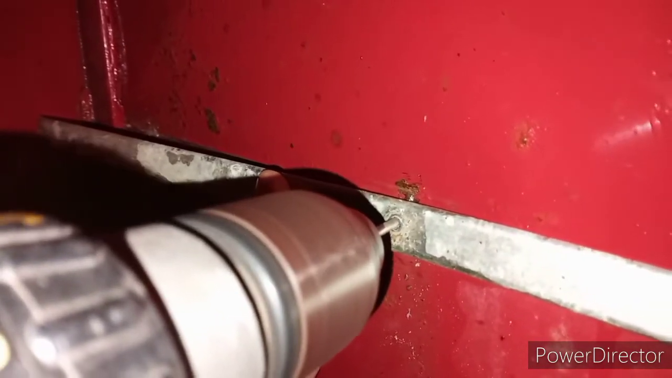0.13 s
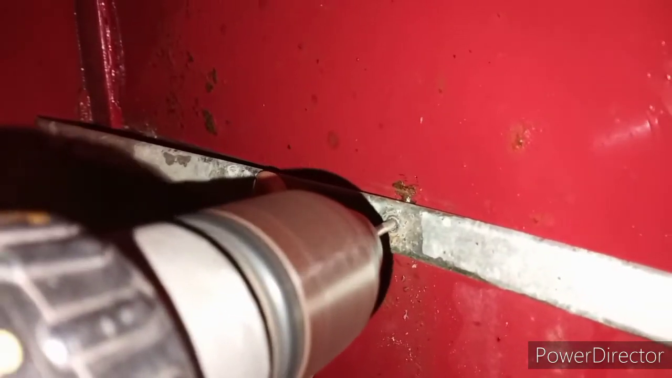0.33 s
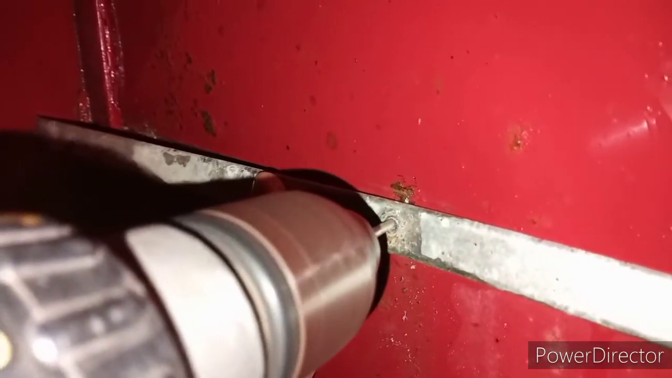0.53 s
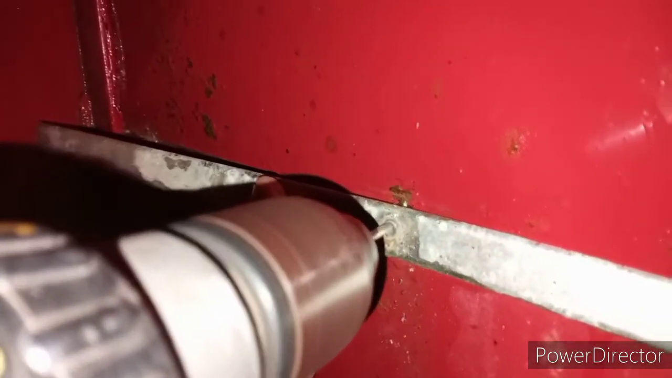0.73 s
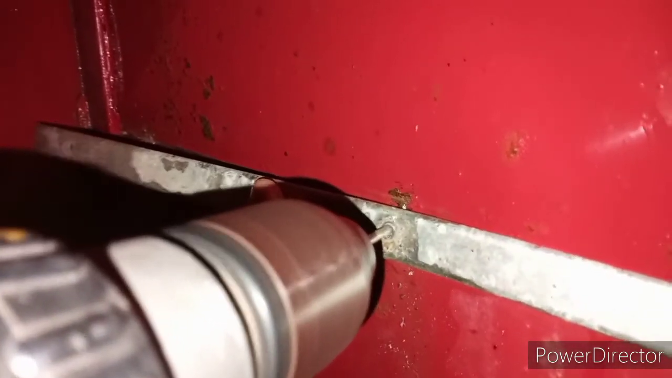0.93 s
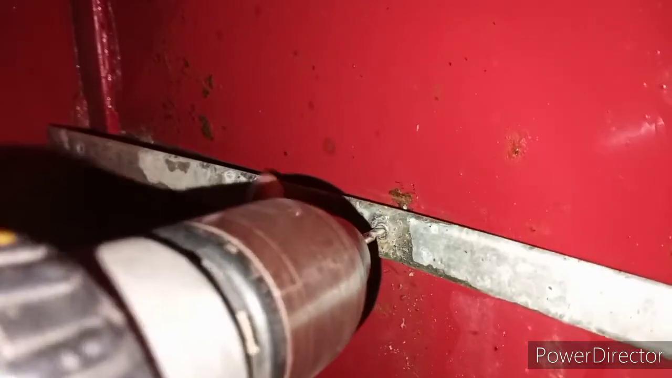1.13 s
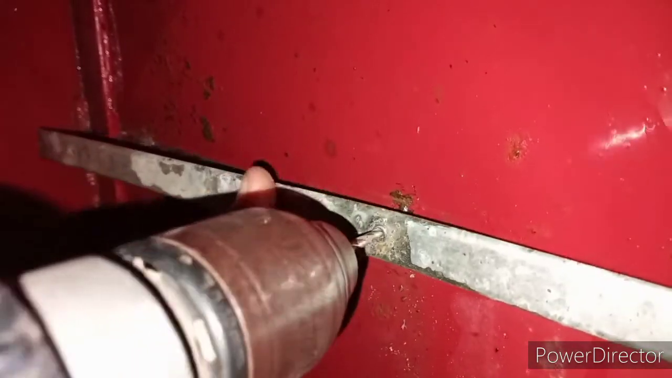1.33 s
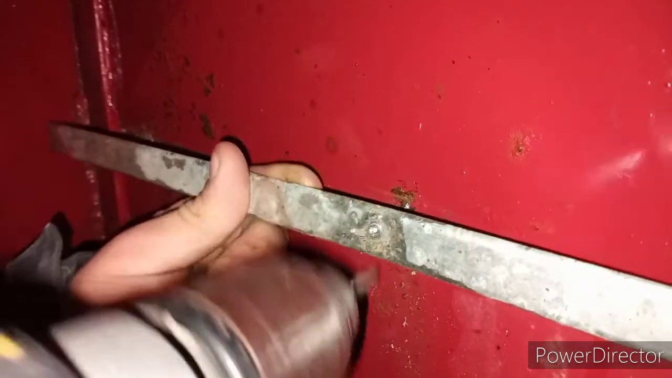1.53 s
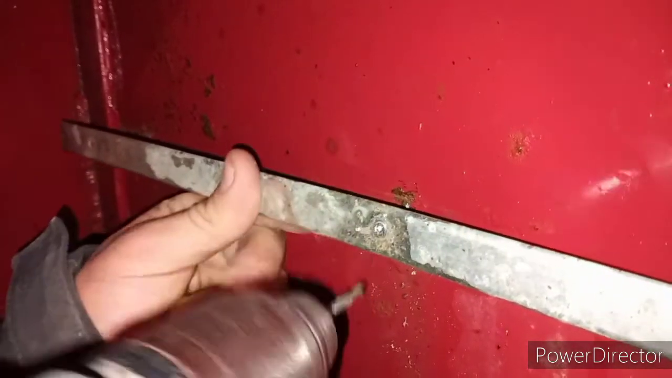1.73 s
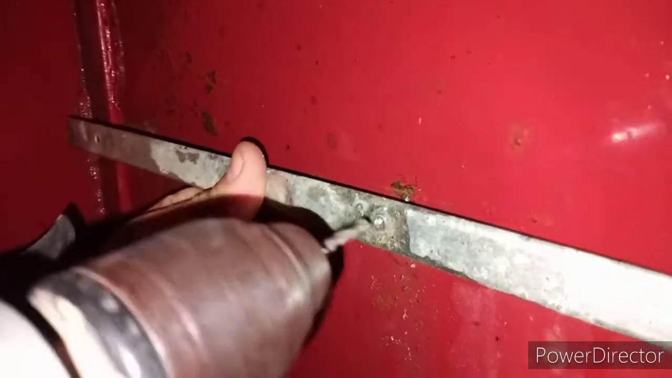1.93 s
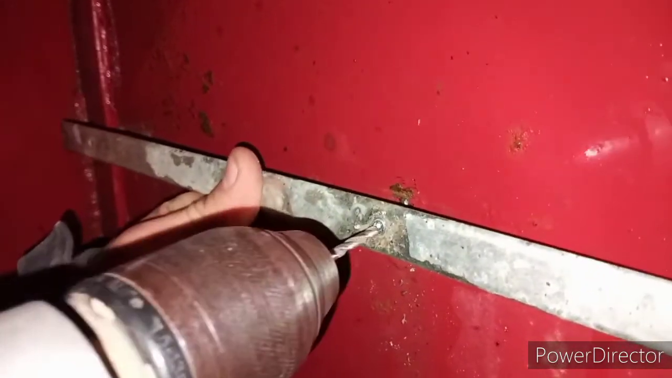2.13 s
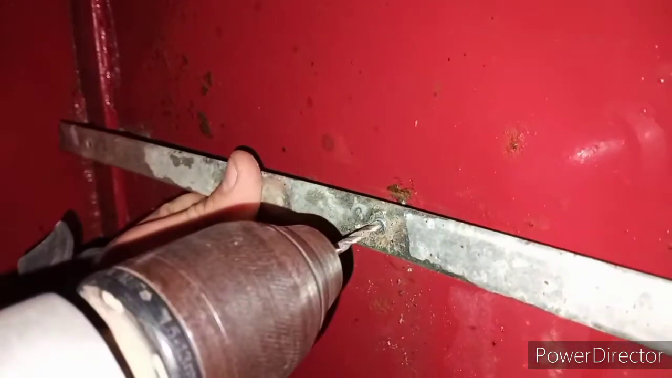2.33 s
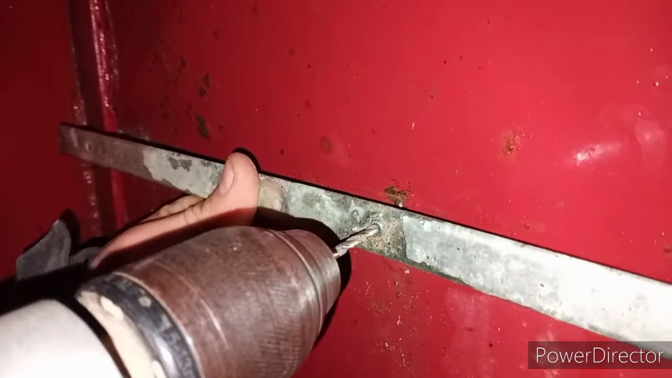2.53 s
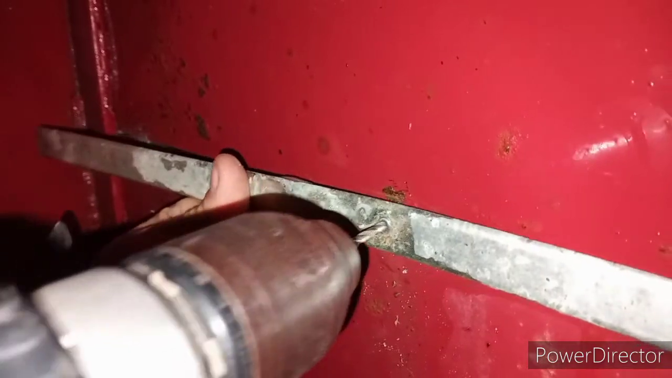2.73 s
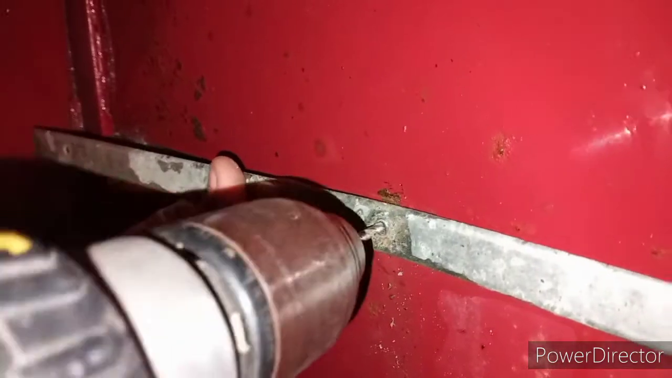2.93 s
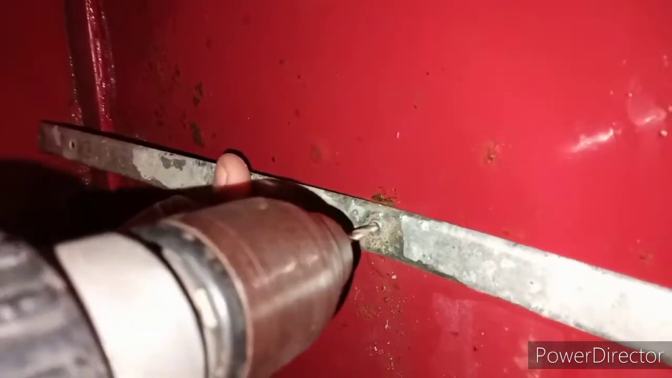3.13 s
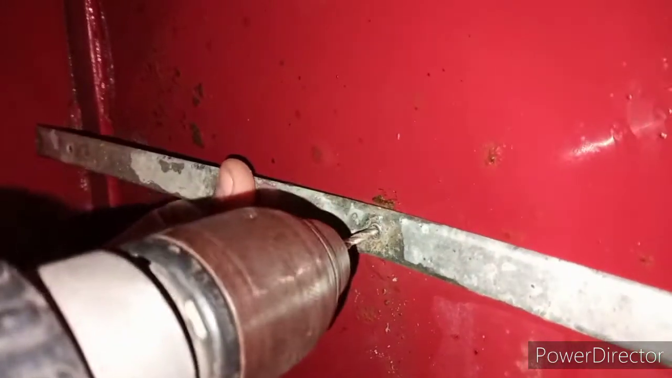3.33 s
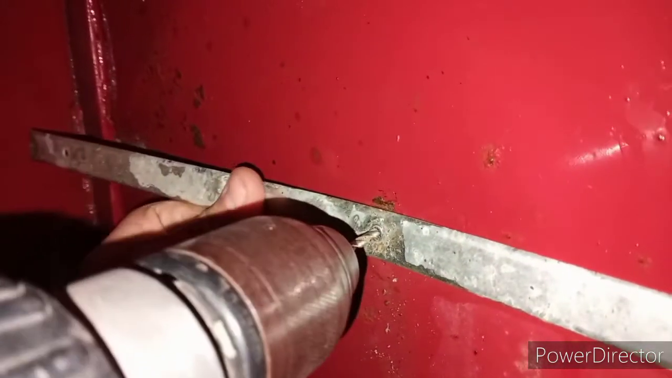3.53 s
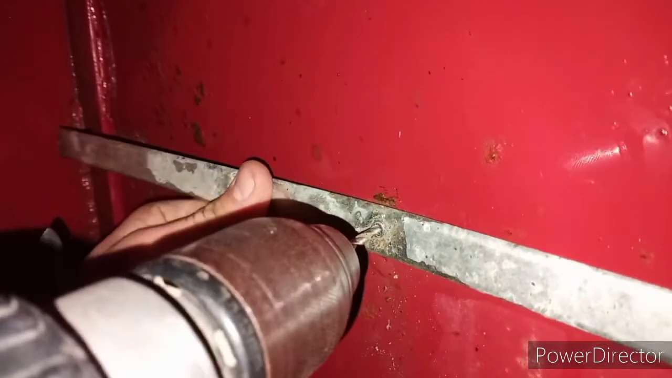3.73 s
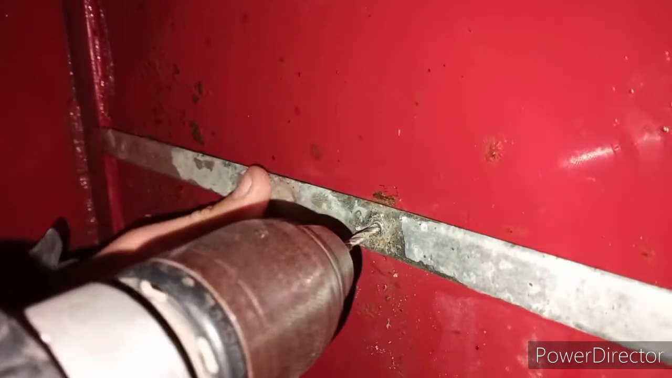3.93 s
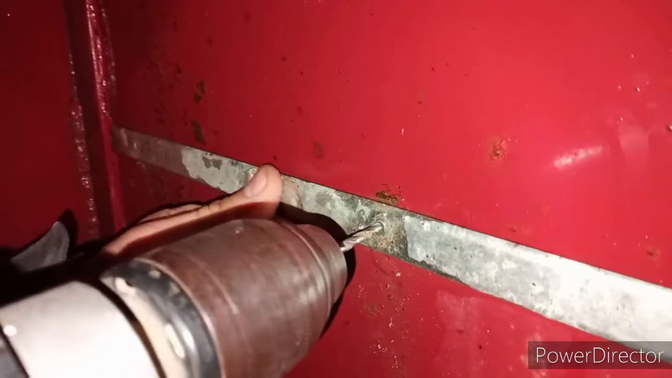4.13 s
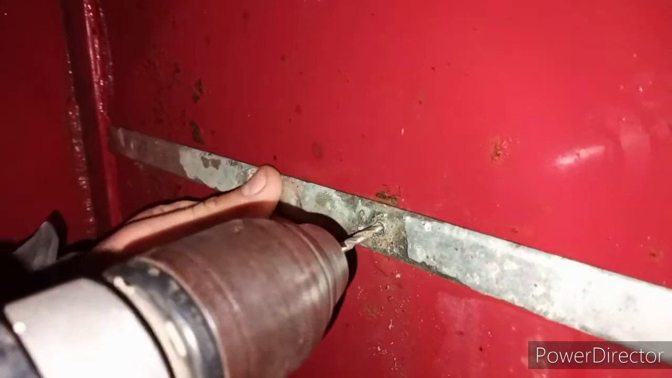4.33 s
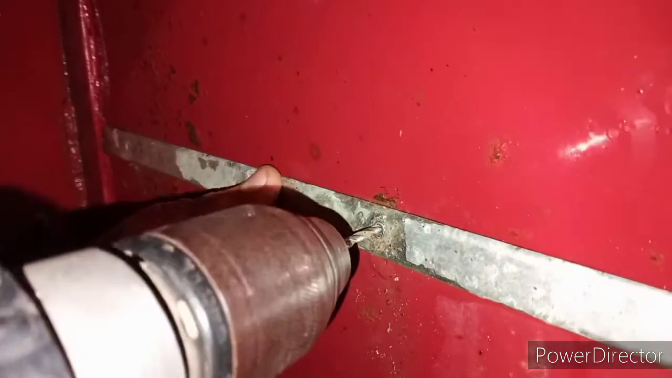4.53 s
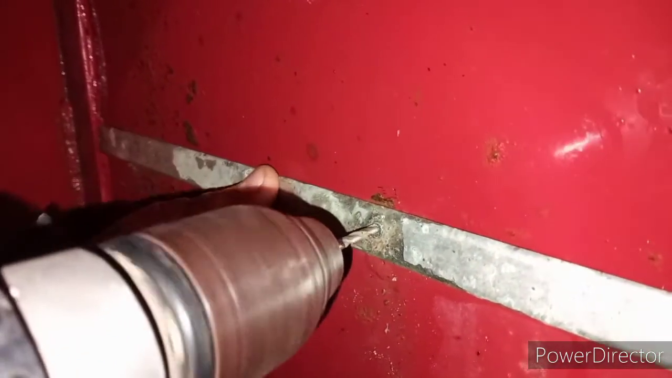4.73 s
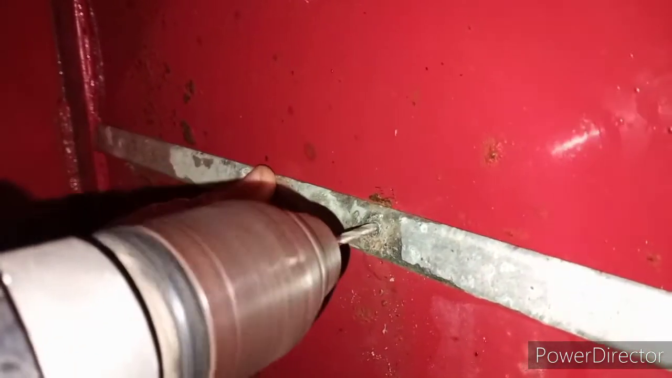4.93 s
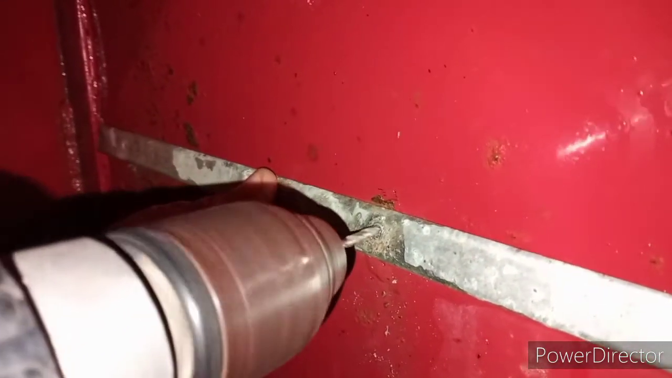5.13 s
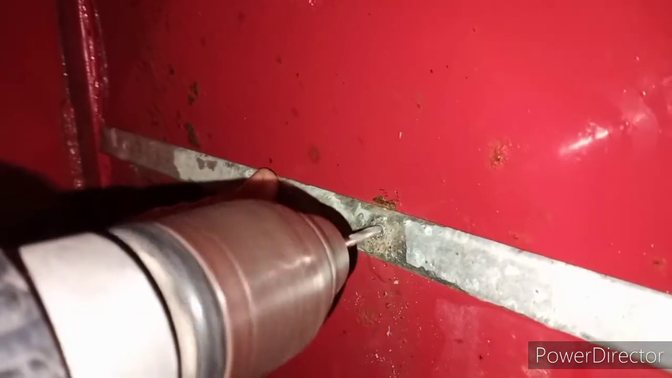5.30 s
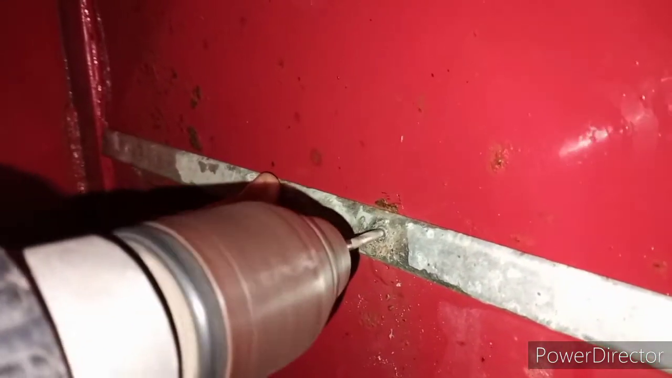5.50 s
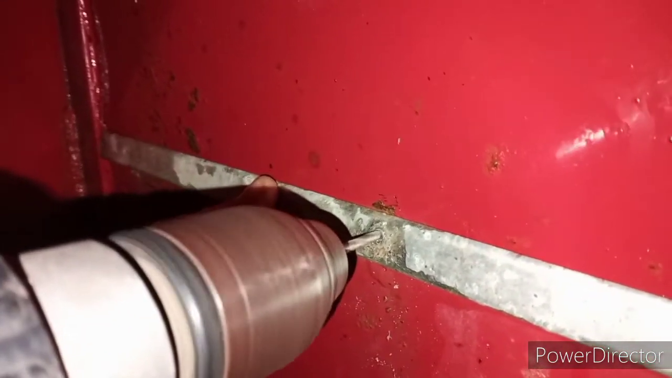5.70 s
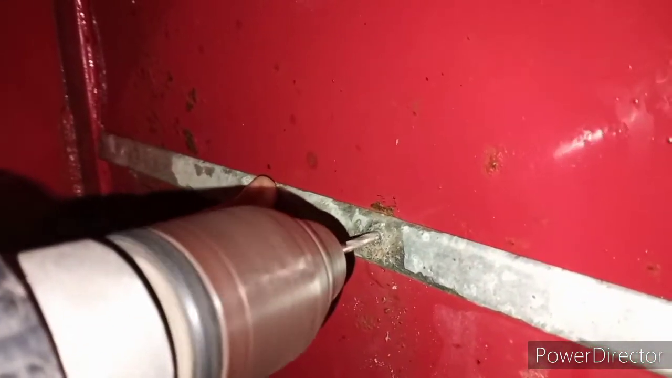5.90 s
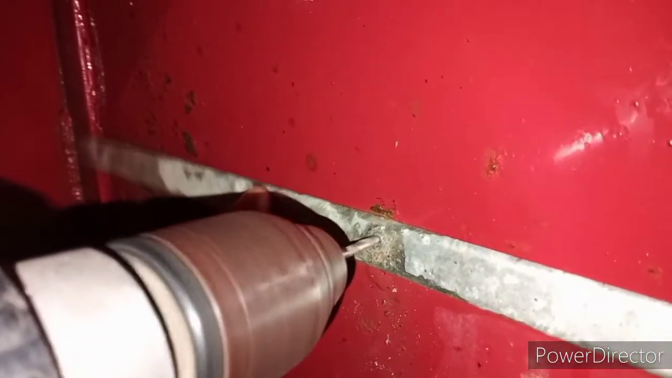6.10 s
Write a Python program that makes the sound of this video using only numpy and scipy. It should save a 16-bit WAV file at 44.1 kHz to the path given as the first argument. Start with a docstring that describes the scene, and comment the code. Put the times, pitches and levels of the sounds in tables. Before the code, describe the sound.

Fast harsh drilling against thin metal stops abruptly, small squeaks, rustles and clicks fill the pause, then the drill grinds back slowly in rising steps.

```python
"""First a cordless drill at full speed, hissing, whining and drumming a sheet-metal trailer wall,
then braked; a gloved hand shifts a riveted steel strap while the bit scrapes and taps over a low hum,
and a slow run follows in trigger steps. Rotation gives periodic knocks, whine lines and steady noise;
friction and impacts are random or decaying forces; resonators give bit, strap, housing and wall their modes."""
import sys
import numpy as np
from scipy import signal
from scipy.fft import rfft, irfft
from scipy.io import wavfile
from scipy.ndimage import uniform_filter1d

SR = 44100
rng = np.random.default_rng(int(sys.argv[2]) if len(sys.argv) > 2 else 0)


def invert_db(level):
    """Linear amplitude ratio for a level in decibels (20 dB per decade), elementwise."""
    return 10 ** (np.asarray(level, dtype=float) / 20)


def to_wav(sig):
    """Store sig (one row per channel, or 1-D mono) as 16-bit WAV at the path in sys.argv[1].

    Samples outside -1..1 are clipped; the rate is SR.
    """
    pcm = np.clip(np.atleast_2d(sig), -1, 1) * 32767
    pcm = np.round(pcm).astype(np.int16)
    wavfile.write(sys.argv[1], SR, pcm.T)  # frames by channels


N = 271656
T = np.arange(N) / SR


def columns(table):
    """Piecewise-linear envelopes: returns a gate for the table's time span and its interpolated columns."""
    s, *cols = np.transpose(table)
    edge = np.minimum(T - s[0], s[-1] - T) / .004
    # a sound already running at time 0, or still running at the end, has no fade there
    running = (s[0] <= 0) * (T < .1) + (T > 6)
    on = np.clip(edge + running, 0, 1)
    return on, [np.interp(T, s, c) for c in cols]


def unit(x, on=1.):
    """Power normalisation: scales to rms 1 over the gate `on`."""
    return x / np.sqrt(np.sum((x * on) ** 2) / np.sum(on + 0 * x) + 1e-18)


def colour(x, points):
    """Minimum-phase filtering: the folded cepstrum makes a causal filter of a (Hz, dB) spectrum."""
    hz, db = np.transpose(points)
    grid_hz = np.linspace(1, SR / 2, 1025)
    log_gain = np.interp(np.log(grid_hz), np.log(hz), db) * np.log(10) / 20
    cepstrum = irfft(log_gain)
    cepstrum[1:1024] *= 2
    cepstrum[1025:] = 0
    impulse = irfft(np.exp(rfft(cepstrum)))[:1024]
    return signal.fftconvolve(x, impulse)[:N]


def ring(x, modes):
    """Modal superposition: a sum of damped resonances (Hz, width Hz, dB)."""
    total = 0
    for hz, width, db in modes:
        b, a = signal.iirpeak(hz, hz / max(width, 4), fs=SR)
        total = total + invert_db(db) * signal.lfilter(b, a, x)
    return total


def walk(rate):
    """Low-passed randomness: levels held 1 / rate s, slewed by two averages; spread near 1."""
    k = int(SR / rate)
    held = np.repeat(rng.standard_normal(N // k + 1), k)
    return 1.21 * uniform_filter1d(uniform_filter1d(held, k), k)[:N]


def noise():
    """White noise: equal mean power at every frequency."""
    return rng.standard_normal(N)


def blend(knock, steady, share):
    """Power addition of a once-a-turn part and a steady part."""
    share = np.clip(share, 0, 1)
    return np.sqrt(share) * knock + np.sqrt(1 - share) * steady


def slides(rows, edge_s):
    """Contact envelope: sets in and lets go around edge_s, its level gliding in between."""
    total = 0
    for s, length, first_db, last_db in rows:
        level = invert_db(np.interp(T, [s, s + length], [first_db, last_db]))
        edge = np.minimum(T - s, s + length - T) / edge_s
        total = total + level * np.clip(edge + .5, 0, 1) ** 2
    return total


def rubbed(rows, modes, edge_s):
    """Random excitation of resonators: gritty noise keeps a few modes ringing."""
    grit = noise() * invert_db(6.3 * walk(150))
    return slides(rows, edge_s) * unit(ring(ring(grit, modes), modes))


# faint steady hiss: (frequency [Hz], relative density [dB])
HISS_FLOOR = [(350, -47), (600, -20), (3080, -26), (3340, -17), (5330, -1.5), (6730, 11), (8390, -18),
              (10600, -4), (12500, -10), (13000, -26), (16000, -21)]


def hiss_floor():
    """Stationary broadband noise shaped by one spectrum."""
    return invert_db(-56) * unit(colour(noise(), HISS_FLOOR))


# wall modes of the low hum, the thump and the flexing: (frequency [Hz], width [Hz], level [dB])
THRUM = [(110.2, 16, 2), (144.1, 16.5, 2)]
THUMP = [(55, 25, -32), (76, 43, 23)]
FLEX = [(197, 126, 4), (297.4, 26, 3), (402, 61, -5.5), (472, 33, -5.5)]
# the hand bumps the wall: (time [s], thump [dB], hum [dB], flexing [dB])
WALL = [(1.02, -55, -32, -29.5), (1.08, -52, -34, -46), (1.2, -48, -55, -44), (1.45, -49, -40, -42),
        (1.79, -54, -47, -56), (1.97, -60, -56, -50), (2.16, -58, -60, -46), (2.51, -52, -60, -68),
        (2.66, -52, -53, -50), (3.3, -57, -41, -52), (3.446, -26.5, -30, -37.5), (3.661, -43, -39, -48.5),
        (3.79, -36.5, -32.5, -42.5), (3.99, -42, -39, -34), (4.218, -17.5, -29, -62),
        (4.633, -38, -13, -27)]


def stirred_wall(hand):
    """Modal response of a panel: the hand and its bumps drive thump and flexing over a wavering hum."""
    attack_s, fade_s = 0.0046, 0.064
    hum = invert_db(-46.5 + 1.5 * walk(12))
    gains = [invert_db(-12.5) * hand, hum, invert_db(-14.5) * hand]
    for s, *levels_db in WALL:
        age = np.maximum(T - s, 0)
        bump = (1 - np.exp(-age / attack_s)) * np.exp(-age / fade_s)
        gains = [gain + invert_db(db) * bump for gain, db in zip(gains, levels_db)]
    total = 0
    for gain, modes in zip(gains, (THUMP, THRUM, FLEX)):
        total = total + gain * unit(ring(ring(noise(), modes), modes))
    return total


# glove rustle spectrum: (frequency [Hz], relative density [dB])
RUSTLE = [(880, -23), (1500, -19), (1640, -15), (2510, -7), (3410, -9), (6370, 4), (8400, -17.5),
          (9850, -13), (13500, -22), (14900, -5), (16000, -23)]


def glove_rustle(hand):
    """Random micro-contacts: fluctuating coloured noise follows the hand's motion."""
    return hand * unit(colour(noise() * invert_db(1.5 * walk(60)), RUSTLE))


# the bit tip scrapes along the strap: (start [s], length [s], first level [dB], last level [dB])
DRAG = [(1.005, 0.095, -40, -52), (1.345, 0.073, -49, -48), (3.095, 0.25, -39.5, -45),
        (3.33, 0.193, -38.5, -34.5), (3.66, 0.09, -65, -67), (3.93, 0.064, -60, -45),
        (3.99, 0.16, -33.5, -39)]
# scrape spectrum: (frequency [Hz], relative density [dB])
SCRAPE = [(210, -23), (350, 1), (433, -27), (525, 1), (1060, 1), (1760, 2.5), (4500, -8.5), (5850, -37),
          (9900, -120)]
# strap modes: (frequency [Hz], width [Hz], level [dB])
STRAP = [(550, 23, -42), (1262, 21, -20.5), (1422, 67, -17.5), (1723, 110, -18.5), (1880, 47, -21.5),
         (2470, 45, -21)]


def strap_scrape(hand):
    """Friction over a rough surface: grit noise is heard directly and through the strap's modes."""
    drag = noise() * invert_db(2.0 * walk(120))
    scrape = unit(unit(colour(drag, SCRAPE)) + invert_db(-4.5) * unit(ring(drag, STRAP)))
    return (invert_db(-15.5) * hand + slides(DRAG, .025)) * scrape


# glove rustle between the runs: (time [s], level [dB])
HANDLING = [(.96, -34), (1, -43), (1.07, -41.5), (1.23, -44), (1.29, -37), (1.45, -38), (1.69, -47),
            (2.08, -41), (2.16, -48), (2.2, -58), (2.3, -64), (2.45, -54.5), (2.56, -42), (2.81, -37.5),
            (2.94, -45.5), (3.14, -43.5), (3.41, -39), (3.57, -41.5), (3.64, -47), (3.73, -36.5),
            (3.8, -49.5), (3.97, -45.5), (4.02, -36), (4.13, -40.5), (4.18, -47), (4.23, -38.5), (4.4, -37),
            (4.68, -34)]


def handling():
    """Common excitation: one moving hand stirs glove, strap grit and wall together."""
    on, (rustle_db,) = columns(HANDLING)
    hand = invert_db(rustle_db)
    return on * (glove_rustle(hand) + strap_scrape(hand) + stirred_wall(hand))


# the strap rings as the bit lets go: (start [s], length [s], first level [dB], last level [dB])
PING = [(1.379, 0.09, -27.5, -56)]


def strap_ping():
    """A single damped mode, its level gliding down."""
    return rubbed(PING, [(1480, 130, 0)], .01)


# the bit squeaks out of its hole: (start [s], length [s], first level [dB], last level [dB])
WITHDRAW = [(1.255, 0.075, -46.5, -30.5), (1.352, 0.0595, -16.5, -27.5)]
# bit modes: (frequency [Hz], width [Hz], level [dB])
BIT = [(3800, 61, -9), (5150, 210, -2.5), (5830, 250, -7), (6360, 440, -3.5), (7140, 580, -8)]


def withdraw_squeak():
    """Friction-driven resonance of the bit in its hole."""
    return rubbed(WITHDRAW, BIT, 0.0034)


# the housing sings during the slow run: (start [s], length [s], first level [dB], last level [dB])
HOUSING_SONG = [(5.285, .145, -21.5, -29), (5.55, 0.088, -25, -24)]


def housing_song():
    """Randomly driven resonance: one broad housing mode sings at about 4 kHz."""
    return rubbed(HOUSING_SONG, [(3960, 310, 0)], 0.03)


# taps: (time [s], relative level [dB], treble re level [dB], strap drive re level [dB], fade [s])
TAPS = [(1.012, -19, -19, 4, 0.0045), (1.0626, -24, -18, -11, 0.013), (1.3536, -20.5, -10, -33, 0.01),
        (1.366, -24, -10, -22, .0056), (1.3835, -32, -2, -26, .006), (1.3974, -23.5, -9, -24, 0.0057),
        (2.1, -25, -17, -38.5, .004), (2.135, -38, -14, -23.5, .0095), (2.153, -36, -10, -21, .01),
        (2.2317, -49, -28, 19.5, .003), (2.5448, -36, -10, -5, .006), (2.5582, -21.5, -7.5, -30, 0.0052),
        (2.6292, -24.5, -22, -15, 0.0029), (2.655, -30, -20, -13, .0053), (3.269, -32, -28, 14, .0054),
        (3.3387, -27.5, -30, 15, .0055), (3.374, -30, -19, 8, .0065), (3.4476, -27.5, -13, 6, .0055),
        (3.474, -31, -25, 11, .0046), (3.4991, -25.5, -26, 18, 0.007), (4.066, -31, -29, 22, .008),
        (4.221, -20.5, -19, 3, .0065), (4.587, -21, -25, -8, 0.0048), (4.6084, -10.5, -26, 5, 0.0027),
        (4.6381, -8, -16.5, 11, 0.0043)]
# tap spectrum: (frequency [Hz], relative density [dB])
TAP = [(290, -23), (500, -8), (1090, -11), (1520, -13.5), (2670, -6.5), (3860, -2.5), (4270, -7),
       (5010, -4.5), (6250, 3), (9500, -22), (12400, -78), (20900, -120)]
# wall panel modes, boom and drumming: (frequency [Hz], width [Hz], level [dB])
BOOM = [(84.5, 7.1, -21), (102.4, 10, 2), (115.8, 9.4, -9.5)]
DRUM = [(147.8, 9, -1), (185.5, 130, 0), (245.3, 22, -14.5), (282.2, 11, -7.5), (328, 12, -38),
        (475, 200, -14)]


def taps():
    """Impact excitation: decaying contacts give a crack, a treble spit, strap and bit rings and a wall thud."""
    crack, spit, strap, thud = np.zeros((4, N))
    for s, db, treble_db, ring_db, fade_s in TAPS:
        i = int(s * SR)
        fall = invert_db(db) * np.exp(-T[:N - i] / max(fade_s, .001))
        crack[i:] += fall
        spit[i:] += invert_db(treble_db) * fall
        strap[i:] += invert_db(ring_db) * fall
        thud[i:] += invert_db(-26) * fall
    grain = noise()
    grain[(np.array(TAPS)[:, 0] * SR).astype(int) + 1] = 2.0  # a firm first touch
    high = [(8000, -46), (10000, -2), (13000, -12), (15000, 5), (16000, -13)]  # (Hz, dB)
    direct = colour(grain * crack, TAP) * 1.82 + colour(grain * spit, high) * 4.0
    metal = ring(grain * crack, BIT) * 0.18 + ring(grain * strap, STRAP) * 8
    return direct + metal + ring(thud, BOOM + DRUM) * 8


# trigger switch squeal as the motor takes up: (time [s], frequency [Hz], level [dB])
SQUEAL = [(4.588, 6030, -56), (4.596, 6000, -14), (4.606, 6580, -21), (4.62, 7100, -28), (4.634, 7000, -28),
          (4.64, 7000, -55)]


def squeal():
    """Frequency modulation: integrated frequency gives a mostly rising whistle with its octave."""
    on, (hz, db) = columns(SQUEAL)
    phase = 2 * np.pi * np.cumsum(hz) / SR
    tone = np.sin(phase) + invert_db(-21) * np.sin(2 * phase)
    return on * invert_db(db + 3.7 * walk(190)) * tone


def wall_drumming(push, shove, boom_db, drum_db, on):
    """Forced panel vibration: once-a-turn pushes and random chatter drive the wall's modes."""
    chatter = noise() * invert_db(2.8 * walk(11))
    share = np.minimum(shove, .86)  # some chatter always remains
    wall = 0
    for db, modes in ((boom_db, BOOM), (drum_db, DRUM)):
        turned = unit(ring(push, modes), on)
        steady = unit(ring(chatter, modes), on)
        wall = wall + invert_db(db) * blend(turned, steady, share)
    # the big panel only speaks low
    return signal.sosfilt(signal.butter(2, 750, fs=SR, output="sos"), wall)


# gear hiss and its treble sizzle: (frequency [Hz], relative density [dB])
HISS = [(2060, -25.5), (3500, -5.5), (3730, -7.5), (4570, -12), (5550, -1), (5820, 0), (6600, 4), (7170, 0),
        (8500, -26.5), (11000, -42), (18700, -120)]
SIZZLE = [(4410, -44.5), (7500, -4.5), (8200, -9), (9730, -7), (12200, -10), (13600, -13), (14900, 2.5),
          (15600, -1.5), (16000, -27)]


def gear_noise(burst, grit, knock, sizzle_db, on):
    """Amplitude-modulated noise: gears and bit hiss in bursts once a turn and in random grit."""
    hiss = unit(colour(noise() * blend(burst, grit, 0.75 * knock), HISS), on)
    sizzle = unit(colour(noise() * blend(burst, grit, 1.06 * knock), SIZZLE), on)
    return hiss + invert_db(sizzle_db) * sizzle


def housing_rattle(blow, burst, grit, knock, repeats, spectrum, on):
    """Periodic and random excitation: repeated flaw strikes, noisy bursts and grit share one spectrum."""
    # the same flaw strikes on every turn, so part of each knock repeats the one before
    flaw = noise()[:800] * np.exp(-T[:800] / 0.0046)
    repeat = unit(signal.fftconvolve(blow, flaw)[:N], on)
    knocks = blend(repeat, unit(noise() * burst, on), repeats)
    return unit(colour(blend(knocks, noise() * grit, knock), spectrum), on)


# housing modes: (frequency [Hz], width [Hz], level [dB])
HOUSING = [(1600, 71, 2.5), (1920, 220, 7.5), (2450, 360, 4), (2806, 200, 6), (3100, 100, -21),
           (3270, 170, -5), (4060, 160, -8), (4420, 150, -10.5), (4800, 210, 1)]


def housing_ring(blow, knock, on):
    """Impulse response of the housing, set off again by every turn."""
    return np.sqrt(np.clip(knock, 0, 1)) * unit(ring(blow, HOUSING), on)


# whine lines: (multiple of the turn rate [1], relative level [dB])
WHINE = [(0.964, -15), (2, -8.5), (2.994, 2.5), (5.99, -0.5), (6.88, 0), (10, -31), (10.95, 1), (12.96, 1),
         (14.26, -5.5), (15.03, 0), (17.2, -1), (17.5, -11), (21.34, -2), (22, -4.5), (19.46, 0.5),
         (23.8, -20), (24.9, -6.5), (25.8, -3), (26.8, -5.5), (28.2, -14), (30, -15.5), (29.3, -1.5)]


def gear_whine(turns):
    """Order spectrum: each line is locked to rotation, and phase ripple blurs the higher lines."""
    wobble = .17 * walk(60)  # rad per multiple of the turn rate
    total = 0
    for k, db in WHINE:
        total = total + invert_db(db + 4 * walk(28)) * np.sin(2 * np.pi * k * turns + k * wobble)
    return total


# the cutting edge grabs and the wall drums harder: (time [s], extra drumming [dB], extra motor [dB])
GRABS = [(4.785, 12, 0), (5.388, 7.5, 3.5), (5.475, 4, 2), (5.594, 10, -1), (5.705, 5, 0.5), (5.8, 11, 1),
         (5.94, 3, 0.5), (6.05, 3, 1)]


def drill(speed, run, rattle, lead, whine_db, sizzle_db, shell_db, repeats, rattle_db):
    """Rotating-machine excitation: each turn knocks the housing and shoves the wall, amid steady noise."""
    on, (motor_db, boom_db, drum_db) = columns(run)
    rate = np.interp(T, *np.transpose(speed))  # turns per second
    octaves = np.log2(rate / 100)
    # once-a-turn shares of rattle and wall push: faster turns blur into noise
    knock = .75 - 0.14 * octaves
    shove = .76 - .48 * octaves
    for s, extra_drum_db, extra_motor_db in GRABS:
        grab = np.exp(-((T - s) / 0.03) ** 2)
        drum_db = drum_db + extra_drum_db * grab
        motor_db = motor_db + extra_motor_db * grab
    rattle_db = motor_db + rattle_db + 2.5 * octaves  # faster turns rattle more

    turns = np.cumsum(rate * (T >= speed[0][0])) / SR + lead
    size = invert_db(1.0 * rng.standard_normal(N // 100))[turns.astype(int)]  # each turn its own strength
    since = turns % 1 / rate  # s since the turn began
    burst = size * np.exp(-since / 0.0016) * (1 - np.exp(-since / 0.00098)) / np.sqrt(0.0011 * rate)
    blow = size * (np.diff(np.floor(turns), prepend=0) > 0) / np.sqrt(rate)
    push = size * np.exp(-since / 0.0012)
    grit = invert_db(1.2 * walk(25) + 2.0 * walk(300))  # chips breaking under the bit

    wall = wall_drumming(push, shove, boom_db, drum_db, on)
    gears = gear_noise(burst, grit, knock, sizzle_db, on)
    housing = housing_rattle(blow, burst, grit, knock, repeats, rattle, on)
    shell = invert_db(shell_db) * housing_ring(blow, knock, on)
    whine = invert_db(whine_db) * gear_whine(turns)
    return on * (invert_db(motor_db) * gears + invert_db(rattle_db) * (housing + shell + whine) + wall)


# slow start in trigger steps: (time [s], armature speed [turns/s])
SPEED_SLOW = [(4.674, 39.9), (4.7, 56.27), (4.73, 69.9), (4.78, 58.62), (4.85, 52.22), (4.95, 48.48),
              (5.2, 45.95), (5.28, 47.59), (5.32, 68.51), (5.37, 96.44), (5.46, 111.06), (5.6, 95.69),
              (5.75, 88.61), (5.86, 93.33), (5.91, 108), (5.955, 135), (6.05, 124.65), (6.16, 118.28)]
# slow run: (time [s], motor level [dB], wall boom [dB], wall drumming [dB])
RUN_SLOW = [(4.662, -67, -18, -31), (4.673, -17.5, 2.5, -43), (4.71, -16, -16.5, -19),
            (4.79, -18, -6.5, -30), (4.85, -18, -11, -38), (5.02, -20, -14, -26), (5.26, -19.5, -18.5, -24),
            (5.31, -20, -8, -25.5), (5.38, -19.5, -13, -23.5), (5.5, -19.5, -3, -16.5),
            (5.6, -18, -12.5, -19), (5.82, -18.5, -17, -17.5), (5.9, -17, -5.5, -10),
            (5.95, -17, -13, -11.5), (6.16, -18.5, -11, -10.5)]
# slow rattle spectrum: (frequency [Hz], relative density [dB])
RATTLE_SLOW = [(240, -26.5), (400, -25), (515, -4.5), (591, -23), (650, -2), (1070, -11), (1760, -2),
               (1970, -0.5), (3080, -6.5), (5000, -2.5), (6500, -64), (11000, -120)]


def slow_run():
    """Low-speed rotation: separate knocks with a strong housing ring."""
    return drill(SPEED_SLOW, RUN_SLOW, RATTLE_SLOW, lead=0.0781, whine_db=-22.5, sizzle_db=-5,
                 shell_db=-1.5, repeats=0.5, rattle_db=-1.37)


# fast run braked down: (time [s], armature speed [turns/s])
SPEED_FAST = [(0, 250), (.15, 238.5), (.3, 229.5), (.44, 227), (.6, 229.5), (.8, 237), (.925, 256),
              (.95, 120), (.98, 55), (1.09, 35)]
# fast run: (time [s], motor level [dB], wall boom [dB], wall drumming [dB])
RUN_FAST = [(0.0, -13.5, -35, -18.5), (0.03, -11, -27, -16.5), (0.12, -14.5, -23, -21),
            (0.48, -10, -29.5, -17.5), (0.8, -14, -28, -22.5), (0.916, -15, -10.5, -19),
            (0.946, -17, -30, -57), (0.98, -33, -55, -25), (1.09, -46, -52, -46)]
# fast rattle spectrum: (frequency [Hz], relative density [dB])
RATTLE_FAST = [(240, -23.5), (400, -5.5), (623, -9.5), (693, -8), (1020, -9), (1610, -7.5), (2150, -8.5),
               (5000, -12), (6500, -31), (11000, -120)]


def fast_run():
    """High-speed rotation: the housing ring and the repeating flaw sink into the noise."""
    return drill(SPEED_FAST, RUN_FAST, RATTLE_FAST, lead=0., whine_db=-12.5, sizzle_db=-4.5,
                 shell_db=-13, repeats=.25, rattle_db=-5.5)


def scene():
    """Linear superposition at one microphone, the same in both channels."""
    contacts = handling() + strap_ping() + withdraw_squeak() + taps()
    runs = housing_song() + slow_run() + fast_run()
    mono = hiss_floor() + contacts + squeal() + runs
    return np.array([mono, mono])


def top_cut(x):
    """Nothing passes above the cut-off."""
    return signal.sosfilt(signal.butter(12, 16870, fs=SR, output="sos"), x)


def record(dry):
    """Band limiting and saturation: the phone drops deep bass, rounds loud peaks and cuts the top."""
    x = signal.sosfilt(signal.butter(2, 45, "high", fs=SR, output="sos"), dry)
    rounded = np.tanh(0.9 * x) / 1.081
    mix = signal.sosfilt(signal.ellip(8, .2, 60, 15600, fs=SR, output="sos"), rounded)
    return top_cut(mix)


dry = scene()
out = record(dry)
to_wav(out)
```